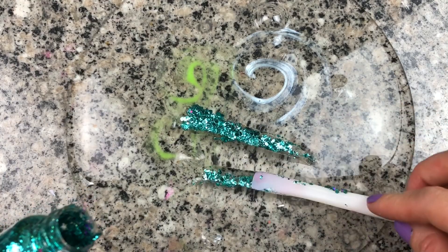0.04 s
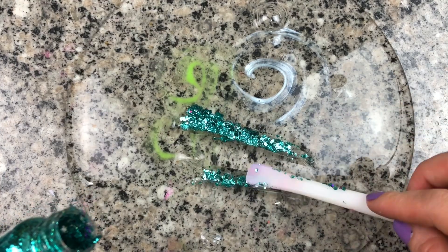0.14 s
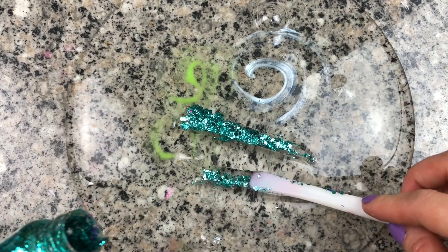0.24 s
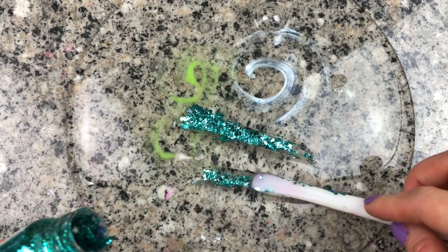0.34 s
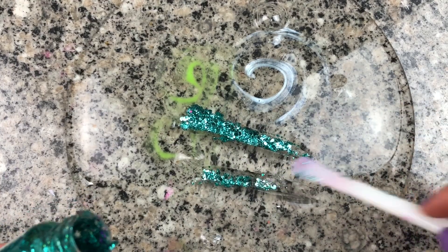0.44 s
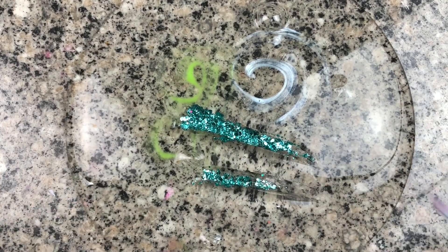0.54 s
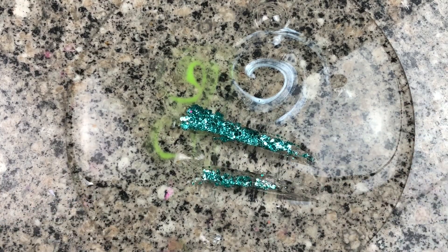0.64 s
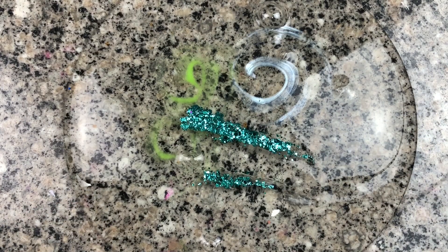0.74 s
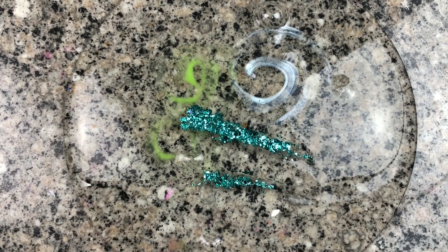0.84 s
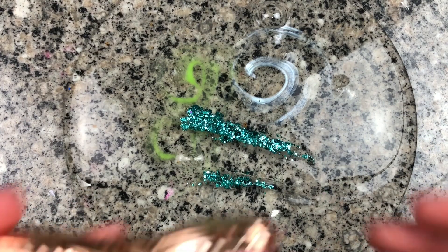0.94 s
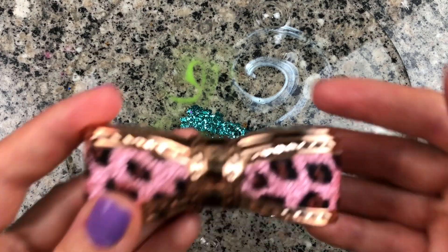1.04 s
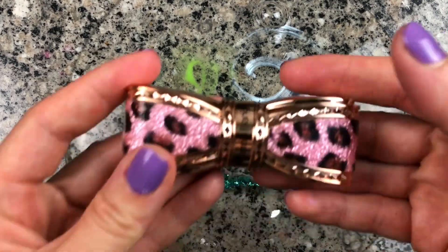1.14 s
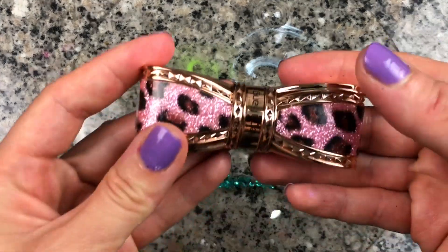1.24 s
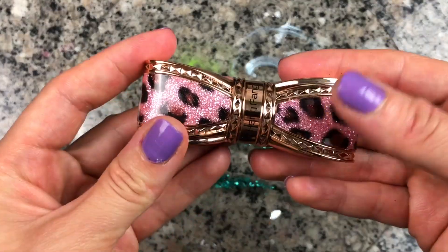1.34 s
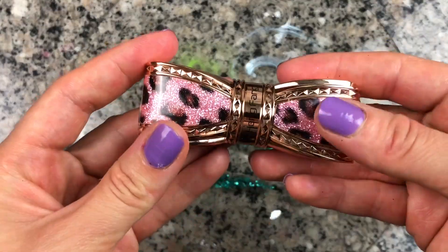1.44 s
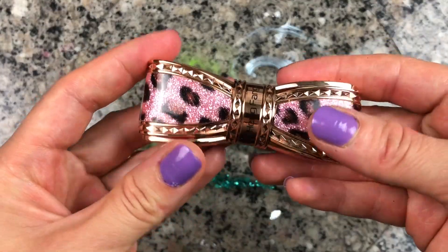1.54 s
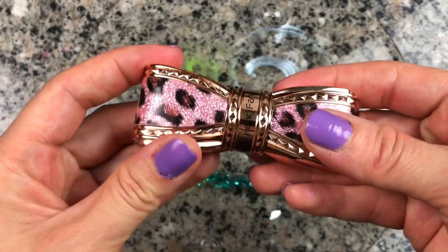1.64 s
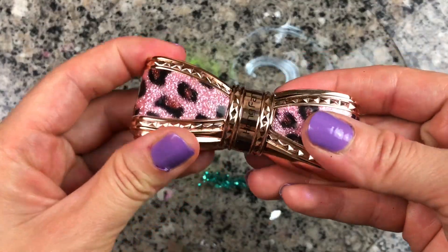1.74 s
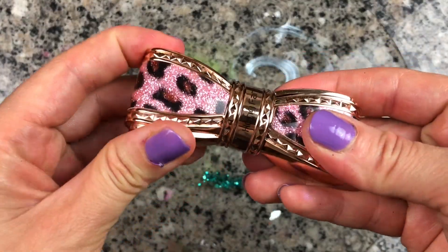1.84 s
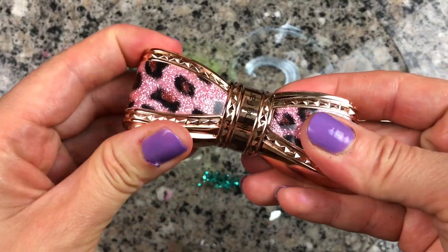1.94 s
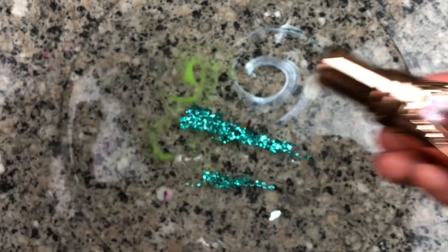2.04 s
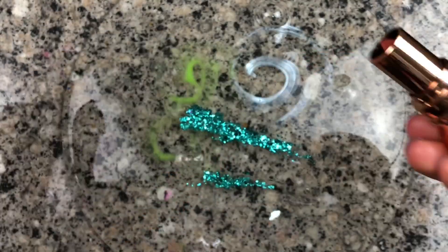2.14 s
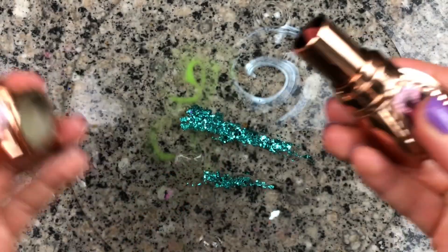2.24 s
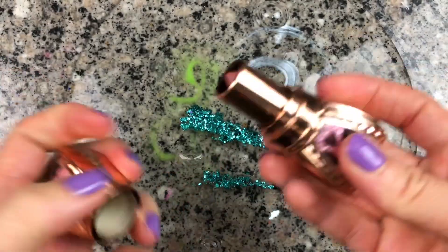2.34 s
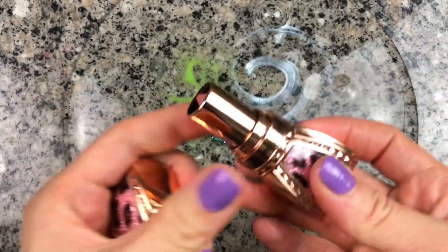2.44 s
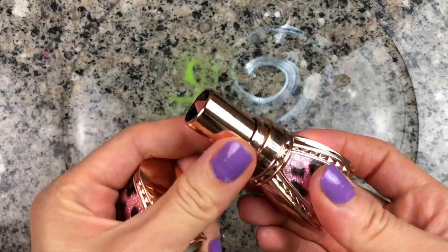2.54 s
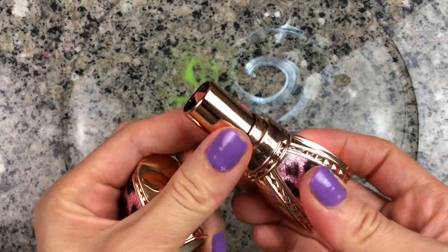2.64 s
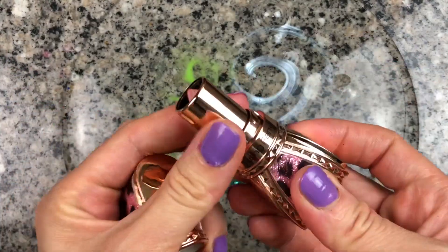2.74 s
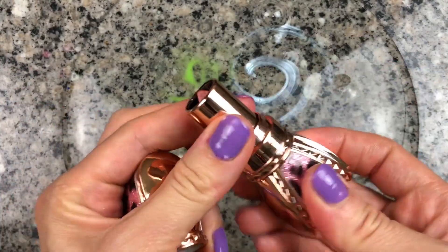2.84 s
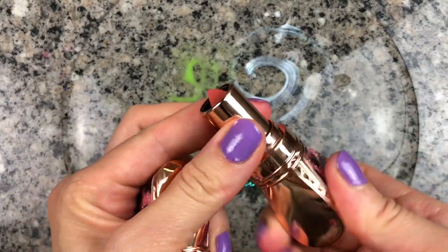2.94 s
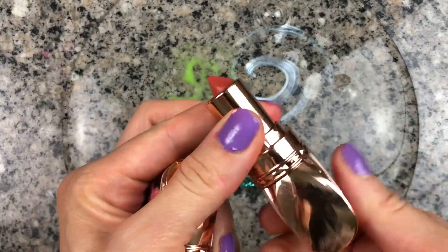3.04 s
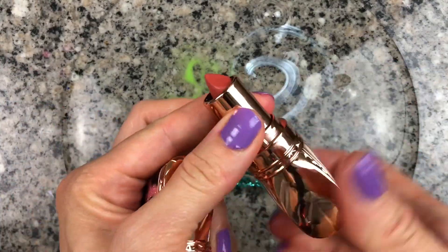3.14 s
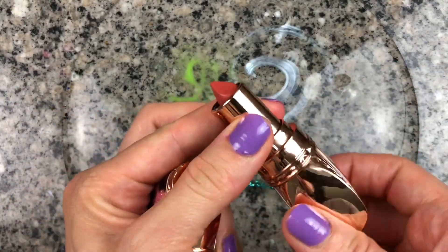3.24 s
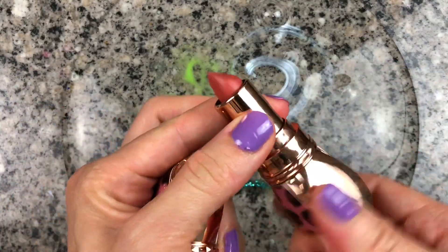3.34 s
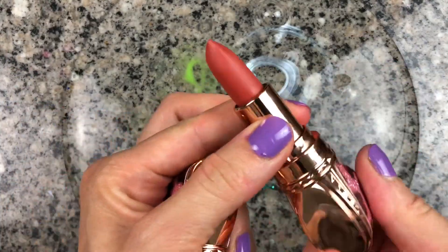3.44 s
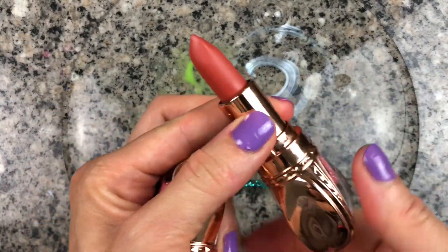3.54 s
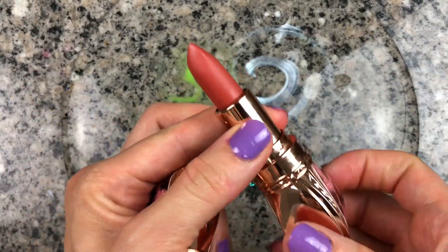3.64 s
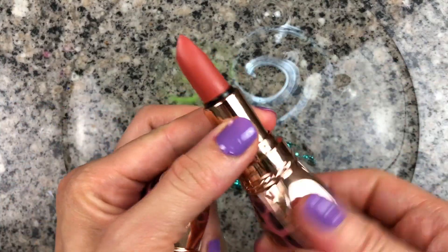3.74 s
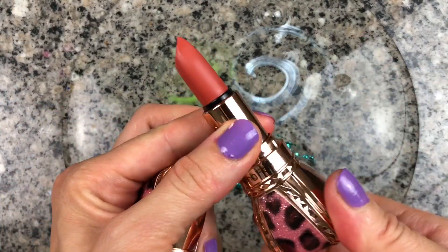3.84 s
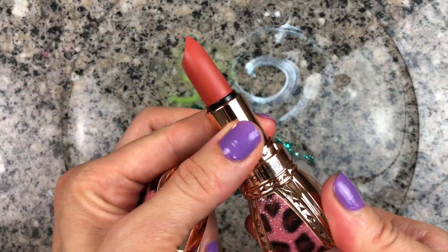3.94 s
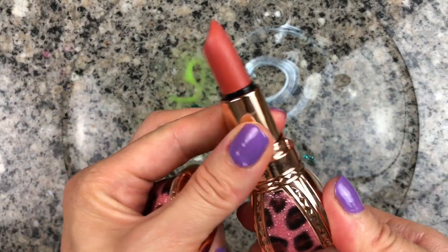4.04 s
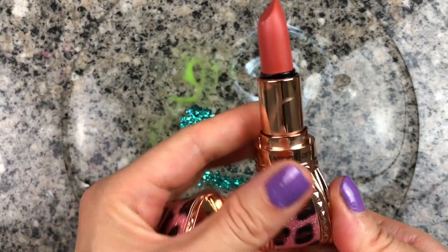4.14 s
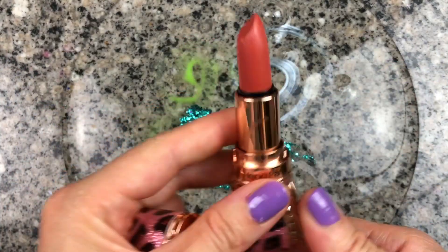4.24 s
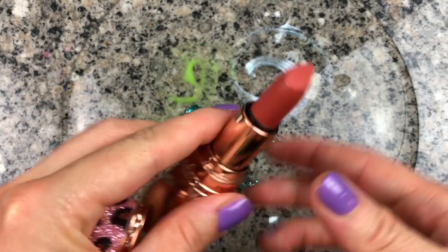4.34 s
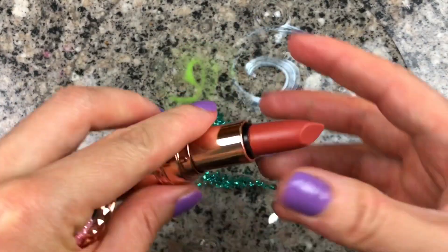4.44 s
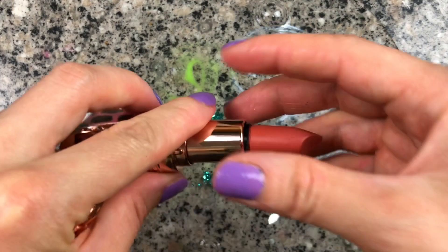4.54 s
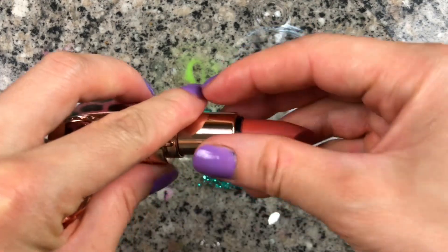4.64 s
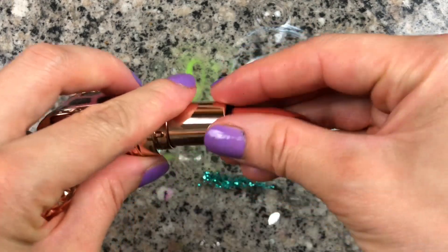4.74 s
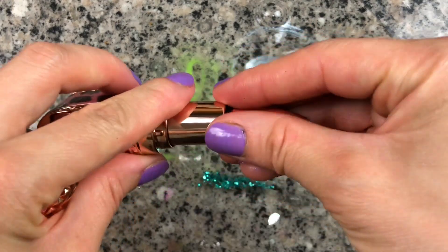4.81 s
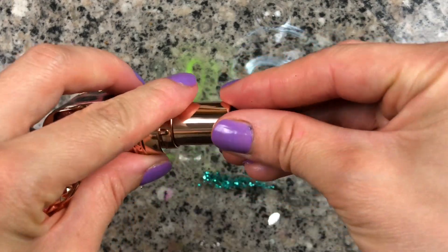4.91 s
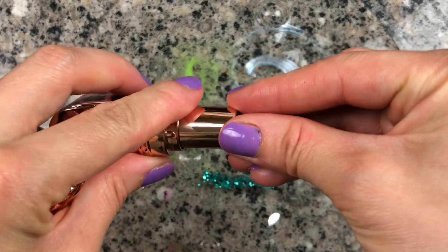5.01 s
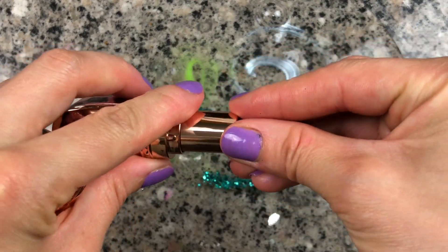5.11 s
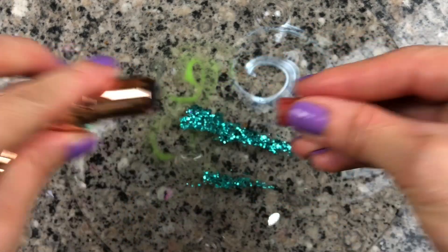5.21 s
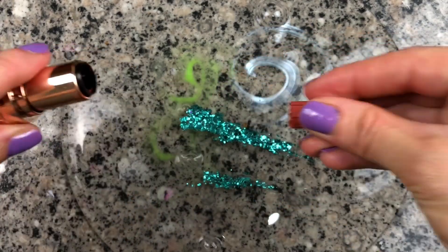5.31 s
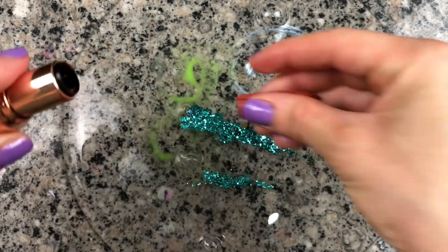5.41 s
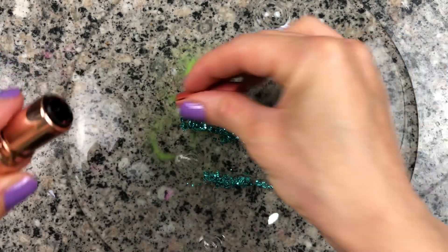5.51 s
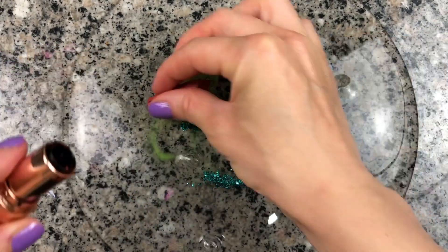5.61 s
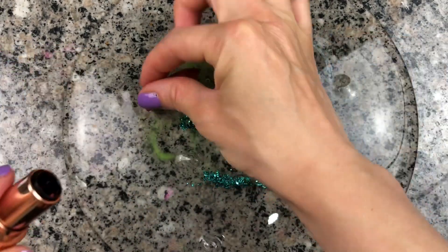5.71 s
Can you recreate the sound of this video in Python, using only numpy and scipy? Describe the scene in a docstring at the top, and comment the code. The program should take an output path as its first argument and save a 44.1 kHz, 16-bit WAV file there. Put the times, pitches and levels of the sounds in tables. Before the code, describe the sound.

Very close microphone, small room with short echoes. Rumbling air and light spatula ticks open, then a cloth swish with a brief dip in background noise. A metal-and-plastic case clacks and its cap bursts open in a distorted pop. Fingers twist the tube with dry, bright stick-slip rubs and crisp clicks, ending in quiet handling and soft air puffs.

```python
"""In a small room, hands work over a stone counter: a spatula ticks and is drawn away, then a lipstick case creaks,
its cap pops off loud enough to overload the microphone, and the tube is twisted up and fingered.
Ticks, rubs and the pop are short noise bursts through resonances; the twist is a gliding tone.
Behind them are room noise, an appliance hum, a swishing sleeve and rumbling air, whose level dips briefly early on."""
import sys
import numpy as np
from scipy import signal
from scipy.fft import rfft, irfft
from scipy.io import wavfile

SR = 44100
rng = np.random.default_rng(int(sys.argv[2]) if len(sys.argv) > 2 else 0)


def wav_out(sig):
    """Save sig, one row per channel (or a flat mono array), as 16-bit PCM at SR to the path in sys.argv[1]."""
    wavfile.write(sys.argv[1], SR, np.round(np.clip(np.atleast_2d(sig).T, -1, 1) * 32767).astype(np.int16))


N = 254456   # length in samples


def from_db(db):
    """Turn decibels into a plain multiplier."""
    return 10 ** (np.asarray(db) / 20)


def rms_one(x):
    """Scale to an rms (average strength) of 1."""
    return x / np.sqrt(np.mean(x ** 2) + 1e-20)


def peak_one(x):
    """Scale so that the highest peak is 1."""
    return x / np.max(np.abs(x))


def in_time(rows, outside=None):
    """Join the (seconds, value) rows by straight lines over the whole scene."""
    seconds, values = np.transpose(rows)
    return np.interp(np.arange(N) / SR, seconds, values, outside, outside)


def at_hz(points, hz):
    """Read a (Hz, value) curve, with straight lines on a logarithmic pitch scale."""
    curve_hz, values = np.transpose(points)
    return np.interp(np.log(hz), np.log(curve_hz), values)


def band(x, low_hz, high_hz):
    """Keep only the sound between two frequencies."""
    edges = [low_hz, min(high_hz, .45 * SR)]
    return signal.sosfilt(signal.butter(2, edges, "band", fs=SR, output="sos"), x)


def resonance(x, hz, width_hz):
    """Ring like one mode of a solid part: a two-pole peak of gain 1."""
    r = np.exp(-np.pi * width_hz / SR)
    feedback = [1, -2 * r * np.cos(2 * np.pi * hz / SR), r * r]
    return signal.lfilter((1 - r * r) / 2 * np.array([1, 0, -1]), feedback, x)


def coloured(spectrum):
    """Steady noise with the given spectrum and an rms of 1."""
    hz = np.maximum(np.fft.rfftfreq(N, 1 / SR), 1)
    white = rng.standard_normal(N)
    return rms_one(irfft(rfft(white) * from_db(at_hz(spectrum, hz)), N))


def stroke(t, s, rise_s, hold_s, fall_s, range_db):
    """Level in dB of a move that swells, holds at 0 dB and fades; rise and fall each span the range."""
    before = (s - t) / rise_s
    after = (t - s - hold_s) / fall_s
    return -range_db * np.maximum(0, np.maximum(before, after))


# Colour of the room noise. Each row: frequency in Hz, relative level in dB per Hz.
ROOM_NOISE_COLOUR = [(35, -32), (60, 3.5), (91, -0.5), (199, -6), (240, -8.5), (289, -6), (448, -14),
                     (2110, -25), (3050, -27), (4840, -29), (7500, -29), (8040, -28.5), (15000, -30.5)]
ROOM_NOISE_DB = -46.5   # rms, before the shared background gain
# Humming appliance. Each row: frequency in Hz, width in Hz, rms in dB before the shared background gain.
APPLIANCE_HUM = [(100.9, 8.5, -57), (198.4, 29, -60), (288.2, 13.7, -59.5)]
# Narrow bands of hiss. Each row: frequency in Hz, width in Hz, rms in dB before the shared background gain.
NARROW_HISS = [(7450, 300, -74.5), (10700, 300, -74.5)]
# Thin steady tones. Each row: frequency in Hz, rms in dB before the shared background gain.
THIN_TONES = [(7392, -78), (7492, -79.5)]


def background():
    """Room noise, hum and hiss from narrowly filtered noise (so they waver), and two thin sine tones."""
    t = np.arange(N) / SR
    white = rng.standard_normal(N)
    out = from_db(ROOM_NOISE_DB) * coloured(ROOM_NOISE_COLOUR)
    for hz, width, db in APPLIANCE_HUM + NARROW_HISS:
        narrow = resonance(resonance(white, hz, width), hz, width)
        out += from_db(db) * rms_one(narrow)
    for hz, db in THIN_TONES:
        out += np.sqrt(2) * from_db(db) * np.sin(2 * np.pi * hz * t)
    return out


# Air moving over the microphone while the hand works close to it.
# Each row: time in seconds, level of the deep part in dB before gusts and the shared background gain.
MOVING_AIR = [(0.0, -22.5), (0.1, -35.5), (0.15, -35.5), (0.22, -33.5), (0.33, -32), (0.45, -35.5),
              (0.56, -45), (0.68, -32.5), (0.76, -48), (0.9, -48)]
# Puffs from quick hand moves.
# Each row: middle in seconds, peak in dB before the shared background gain, length of the push in seconds.
HAND_PUFFS = [(1.489, -38, .03), (1.861, -19.5, 0.018), (2.903, -30.5, 0.016), (3.125, -37, 0.012),
              (3.285, -29.5, 0.024), (3.57, -35.5, 0.012), (5.062, -34, 0.0143), (5.26, -40, .02),
              (5.402, -36.5, 0.019), (5.62, -34, 0.038)]
AIR_UPPER_DB, GUSTY_DB = -14, 4   # upper rumble against the deep part; rms of the random swing


def air():
    """Slow lumpy pressure on the microphone; a puff is one push and its rebound."""
    t = np.arange(N) / SR
    deep, upper, gust = rng.standard_normal((3, N))
    gust_db = GUSTY_DB * rms_one(band(gust, 1, 8))
    moving = from_db(in_time(MOVING_AIR) + gust_db)
    rumble = rms_one(band(deep, 11.3, 36)) + from_db(AIR_UPPER_DB) * rms_one(band(upper, 66, 213))
    out = moving * rumble
    for s, db, length in HAND_PUFFS:
        push = (s - t) * np.exp(-8 * ((t - s) / length) ** 2)
        out += from_db(db) * peak_one(push)
    return out


# Sleeve swishing past. Each row: time in seconds, level in dB before the shared background gain.
SLEEVE_LEVEL = [(0.45, -72), (0.55, -53.5), (0.67, -45.5), (0.75, -50), (0.9, -52.5), (1.2, -64)]
# Colour of the cloth noise. Each row: frequency in Hz, relative level in dB per Hz.
CLOTH_COLOUR = [(350, -36.5), (600, -11), (727, -2), (1240, -11), (1350, -7), (2470, -4), (3300, -11.5),
                (7620, -10), (13800, -18), (16000, -28)]


def sleeve():
    """Cloth swishes: coloured noise that swells and fades."""
    return from_db(in_time(SLEEVE_LEVEL, outside=-120)) * coloured(CLOTH_COLOUR)


# Shared background gain, with a brief dip. Each row: time in seconds, gain in dB.
BACKGROUND_GAIN = [(0, 2.5), (.715, 4.5), (.737, -11.5), (.76, -5.5), (.8, 0.5), (5.77, 0.5)]


def steady_layers():
    """Background, sleeve and air rise and dip together."""
    return from_db(in_time(BACKGROUND_GAIN)) * (background() + sleeve() + air())


# How long echoes last. Each row: frequency in Hz, seconds to die away by 60 dB.
ECHO_T60 = [(200, 0.2), (1400, 0.24), (4000, 0.23), (9000, 0.21), (15000, 0.21)]
ROOM_DB, ROOM_GAP_S = -12.5, 0.0028   # strength of the echoes; middle of their fade-in


def room(x):
    """Walls scatter sound into many echoes: noise that dies away at its own rate in each band."""
    t = np.arange(SR // 2) / SR
    tail = np.zeros(len(t))
    edges = 120 * 2 ** np.arange(0, 7.6, .5)   # half-octave bands, in Hz
    for low, high in zip(edges, edges[1:]):
        t60 = at_hz(ECHO_T60, np.sqrt(low * high))
        tail += band(rng.standard_normal(len(t)), low, high) * from_db(-60 * t / t60)
    tail *= np.clip(t / ROOM_GAP_S - .5, 0, 1)
    tail /= np.sqrt(np.sum(tail ** 2))
    return from_db(ROOM_DB) * signal.fftconvolve(x, tail)[:N]


# Faint hum of the twisting tube, gliding with the turning speed.
# Each row: start in seconds, end in seconds, start pitch in Hz, end pitch in Hz, level in dB before the wobble.
TUBE_TWISTS = [(2.802, 3.051, 510, 606, -53), (3.206, 3.514, 508, 445, -50.5)]


def twist():
    """The turning tube hums: a tone follows the turning speed while noise wobbles its pitch and level."""
    out, t = np.zeros(N), np.arange(N) / SR
    for start, end, from_hz, to_hz, db in TUBE_TWISTS:
        unsteady = 1 + 0.013 * rms_one(band(rng.standard_normal(N), 3, 15))
        hz = np.interp(t, [start, end], [from_hz, to_hz]) * unsteady
        wobble = .6 + .6 * rms_one(band(rng.standard_normal(N), 4, 30))
        level = from_db(db + stroke(t, start, 0.015, end - start, .02, 23))
        tone = np.sin(2 * np.pi * np.cumsum(hz) / SR)
        out += np.sqrt(2) * level * wobble * tone
    return out


# Rubs of skin and tube. Each row: time of full level in seconds, level of the bright part in dB,
# swell, hold and fade in seconds (1 ms at least), main resonance in Hz, dull part against the bright in dB.
SKIN_RUBS = [(0.004, -36, 0.0078, 0.0016, 0.035, 8900, -7.5), (0.288, -28, 0.012, .002, 0.013, 8700, -11.5),
             (0.335, -53, 0.039, 0.032, .04, 8600, -1.5), (0.368, -50, .01, .005, .015, 8750, -13),
             (0.622, -39, .01, .002, .008, 7900, -12), (0.99, -43, .006, .002, 0.015, 6400, -10),
             (1.015, -45.5, 0.021, .012, 0.013, 6500, -10), (2.76, -45.5, 0.052, .12, .05, 9800, -36),
             (2.84, -43.5, .06, 0.053, 0.025, 5100, -5), (2.899, -30.5, 0.0065, 0.0022, 0.025, 10000, -24),
             (2.92, -49, .02, .03, .04, 9700, -7), (2.978, -45.5, .005, 0.017, 0.0099, 5800, 0.5),
             (3.145, -53, .012, 0.0092, .015, 11000, 1.5), (3.23, -45, .08, 0.095, .06, 5230, -4.5),
             (3.258, -27.5, 0.021, 0.0053, 0.032, 5240, -7.5),
             (3.355, -34.5, 0.013, .012, 0.015, 9300, -11), (3.432, -49.5, .008, 0.0026, 0.017, 8500, 5),
             (3.625, -45, 0.074, 0.034, .1, 7400, -3), (3.635, -33, 0.0096, 0.00095, 0.0048, 5530, 7),
             (3.655, -35.5, 0.019, 0.0012, 0.009, 5700, 7), (3.93, -54.5, .12, .02, .07, 7500, -9),
             (4.118, -34.5, 0.019, 0.0037, .009, 9450, -12.5), (4.572, -46, 0.0091, .002, .015, 8540, -12),
             (4.62, -56.5, .04, .02, .03, 8500, -6), (5.036, -43.5, 0.0074, 0.013, .016, 8470, -6.5),
             (5.233, -42.5, .012, .004, 0.017, 9900, -6.5), (5.34, -43.5, .02, 0.013, 0.044, 5560, -8),
             (5.385, -50, .01, .003, 0.0089, 8500, -7), (5.615, -44.5, 0.039, .002, .03, 12850, -7)]
RUB_RANGE_DB, RUB_TOP_HZ = 22.5, 13900   # swell and fade each span this range; top of the bright band
TUBE_HZ, CLUMP_DB = (5280, 10240), 2.5   # the tube's two steady resonances; rms swing that clumps the slips


def rubs():
    """Skin sticks and slips in dense grains: treble shaped by the tube's resonances, with a duller part below."""
    out, t = np.zeros(N), np.arange(N) / SR
    grain_db = 4.6 * np.minimum(rng.exponential(1, (2, N)), 4)
    clump_db = CLUMP_DB * rms_one(band(rng.standard_normal((2, N)), 29, 290))
    streams = rng.standard_normal((2, N)) * from_db(grain_db + clump_db)
    for k, (s, db, rise, hold, fall, hz, dull_db) in enumerate(SKIN_RUBS):
        rise, hold, fall = np.maximum([rise, hold, fall], .001)
        first = max(round((s - 2 * rise) * SR), 0)
        last = round((s + hold + 2 * fall) * SR)
        grains = streams[k % 2, first:last]   # neighbouring rubs use different noise
        steady_modes = sum(rms_one(resonance(grains, tube_hz, 1600)) for tube_hz in TUBE_HZ)
        tube = rms_one(resonance(grains, hz, 2200)) - 0.26 * steady_modes
        treble = rms_one(band(grains, 4600, RUB_TOP_HZ))
        bright = rms_one(treble + 1.1 * tube)
        dull = rms_one(band(grains, 340, 5250)) * from_db(dull_db)
        level = from_db(db + stroke(t[first:last], s, rise, hold, fall, RUB_RANGE_DB))
        out[first:last] += level * (bright + dull)
    return out


# Nails and case parts ticking. Each row: start in seconds, peak in dB, pitch of the ringing part in Hz,
# seconds for its ring to die by 60 dB (1 ms at least), crack against the ring in dB.
CASE_TICKS = [(0.083, -35, 9000, .0018, -9), (0.1253, -25, 6140, 0.0046, -4),
              (0.1509, -24, 10000, 0.0012, 2), (0.2648, -29, 8000, 0.0012, -6),
              (0.2824, -19, 9800, 0.00096, -3), (0.2892, -12, 9530, .001, -13),
              (0.327, -22.5, 11500, 0.00084, 8), (0.6175, -26, 8040, 0.0013, -8),
              (0.9885, -39, 6230, 0.0034, -6), (1.572, -2.5, 6640, 0.0035, 5.5),
              (1.6067, -21.5, 7160, 0.0014, -11), (1.6901, -23, 6700, 0.0018, 0.5),
              (1.747, -41, 5950, .002, -8), (2.0015, -25.5, 3000, 0.001, -7),
              (2.163, -42.5, 2570, .0033, -7), (2.1902, -29, 5070, 0.0011, 9),
              (2.298, -30, 6060, 0.00076, 6), (2.3565, -37, 6450, .002, -6),
              (2.4277, -28, 6060, 0.0019, -1.5), (2.6384, -34.5, 7500, 0.0012, 2.5),
              (2.768, -39, 2600, 0.0046, -11), (2.796, -22, 3230, 0.0014, -10), (2.8, -29, 4970, 0.002, -2),
              (2.8212, -29, 4000, .0015, -10), (2.85, -33, 1390, 0.0025, -3),
              (2.8984, -20, 9800, 0.0023, 3), (2.9173, -14, 10000, 0.0029, -4),
              (2.9768, -25, 5800, .002, 4), (2.981, -33.5, 2770, .004, -1),
              (3.062, -19.5, 10500, 0.0016, 0.5), (3.149, -30, 3500, 0.00086, -9),
              (3.282, -28.5, 2520, 0.003, -6), (3.3576, -28, 5000, .001, -3),
              (3.4278, -29.5, 9000, 0.0011, 3), (3.6323, -13, 6000, 0.0017, 2.5),
              (3.6478, -19, 2490, 0.0022, 3), (3.6499, -8.5, 8100, 0.0016, 7.5),
              (3.716, -38, 13000, .002, -4), (3.864, -47, 9000, .002, -3), (3.896, -40, 9000, 0.0024, -5),
              (3.9611, -32.5, 7540, 0.0012, -1), (4.0257, -12.5, 5160, 0.0051, -0.5),
              (4.0957, -39, 5200, .0036, -6.5), (4.1176, -26, 10400, .002, -13),
              (4.5748, -38, 2620, 0.0029, -7), (5.036, -34.5, 9450, 0.0016, -4),
              (5.0534, -32.5, 4200, 0.0014, -6), (5.55, -42, 1460, 0.017, -10),
              (5.5729, -29, 1427, 0.023, -8)]
# Dull knocks of the hollow case. Each row: start in seconds, peak in dB.
CASE_KNOCKS = [(1.572, -19.5), (2.8215, -38), (2.85, -33), (2.8967, -31.5), (2.9162, -33.5), (3.15, -34),
               (3.283, -30), (3.6323, -18.5), (3.6478, -26), (3.6506, -13), (4.0259, -33.5)]
CRACK_HZ, FIRM = (1497, 14490), 5.0   # reach of the crack; weight of the firmest touch of a contact
TICK_N = 2000   # samples worked out for each tick


def ticks():
    """Quick touches crack and ring the struck part; dull case knocks, timed in their own table, are added."""
    out, t = np.zeros(N), np.arange(TICK_N) / SR
    touches = rng.standard_normal((len(CASE_TICKS), TICK_N))
    touches[:, 20] += FIRM   # about half a millisecond in
    swell = (t / .00022) ** 2 * np.exp(-t / .00022)   # the contact builds for under a millisecond
    for (s, db, hz, t60, crack_db), touch in zip(CASE_TICKS, touches):
        contact = touch * swell
        width = np.log(1000) / np.pi / max(t60, .001)   # a shorter ring is a wider peak
        lower_mode = resonance(contact, hz - 0.39 * width, width)
        upper_mode = resonance(contact, hz + 0.78 * width, width)
        ring = peak_one(lower_mode - upper_mode)
        crack = peak_one(band(contact, *CRACK_HZ))
        out[round(s * SR):][:TICK_N] += from_db(db) * peak_one(ring + from_db(crack_db) * crack)
    knock = peak_one(resonance(swell, 510, 230) + 1.4 * resonance(swell, 1300, 900))
    for s, db in CASE_KNOCKS:
        out[round(s * SR):][:TICK_N] += from_db(db) * knock
    return out


# Resonances of the hollow cap.
# Each row: frequency in Hz, width in Hz, relative strength in dB before a correction for width.
CAP_MODES = [(260, 250, -17.5), (412, 140, -9), (1060, 260, -4.5), (1398, 260, 1), (1850, 420, -12),
             (2316, 2500, -17), (3640, 190, -12), (5885, 300, 3.5), (6766, 820, 1), (7600, 830, -14.5),
             (9000, 770, -8.5), (13980, 2300, -3.5)]
POP_S, POP_DB, POP_T60_S = 1.8482, 19.5, 0.045   # start; peak before overload; time to die by 60 dB
SLIP_S, SLIP_DB = 1.8441, -24   # the catch slips once just before; burst level against the release


def pop():
    """The catch slips, then lets go: two dying noise bursts ring the hollow cap."""
    t = np.arange(N) / SR
    slip = from_db(SLIP_DB - 60 * np.maximum(t - SLIP_S, 0) / 0.01) * (t >= SLIP_S)
    release = from_db(-60 * np.maximum(t - POP_S, 0) / POP_T60_S) * (t >= POP_S)
    burst = rng.standard_normal(N) * (slip + release) + 1e-18
    cap = np.zeros(N)
    for k, (hz, width, db) in enumerate(CAP_MODES):
        sign = (-1) ** k   # neighbouring modes push opposite ways
        cap += sign * from_db(db) * np.sqrt(1000 / width) * resonance(burst, hz, width)
    return from_db(POP_DB) * peak_one(cap + from_db(-7) * burst)


def scene():
    """Mix hands, cap, echoes and the steady layers; rubs feed the echoes more weakly."""
    clicks, strokes, cap = ticks(), rubs(), pop()
    echoes = room(cap + clicks + from_db(-7) * strokes)
    return (clicks + strokes + cap + echoes + twist() + steady_layers())[None]


def record(dry):
    """The input overloads flat, then everything above 16 kHz is cut."""
    overloaded = np.clip(dry, -.97, .97)
    return signal.sosfilt(signal.ellip(12, .5, 75, 16000, fs=SR, output="sos"), overloaded)


dry = scene()
out = record(dry)
wav_out(out)
```